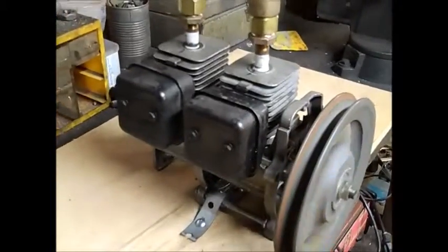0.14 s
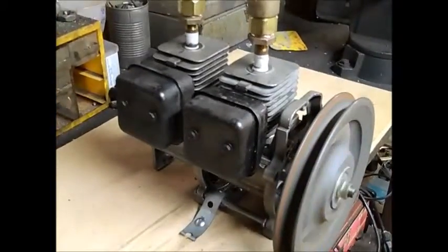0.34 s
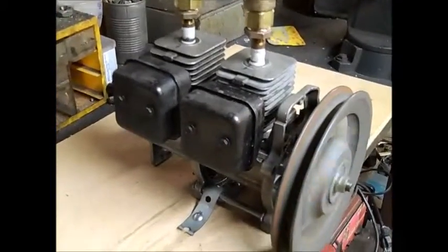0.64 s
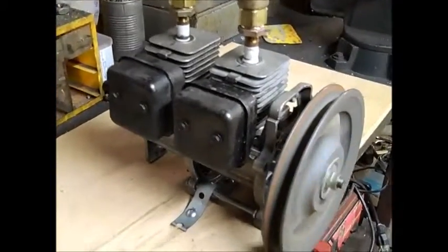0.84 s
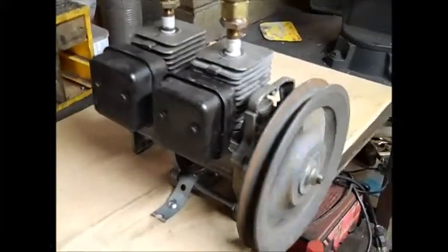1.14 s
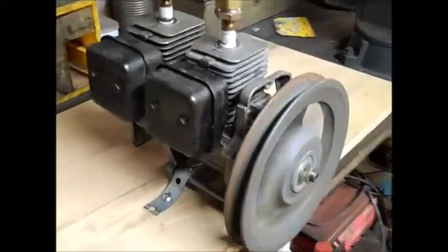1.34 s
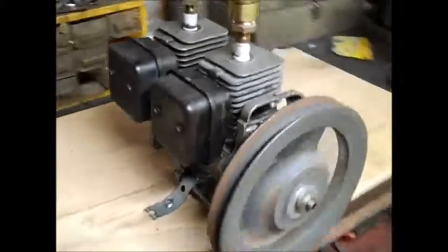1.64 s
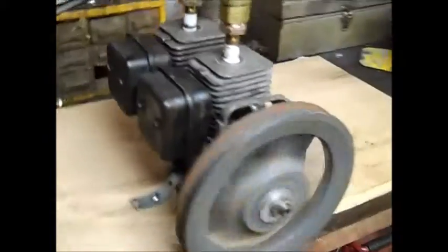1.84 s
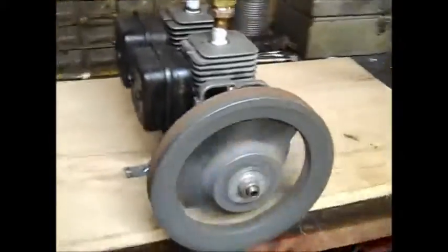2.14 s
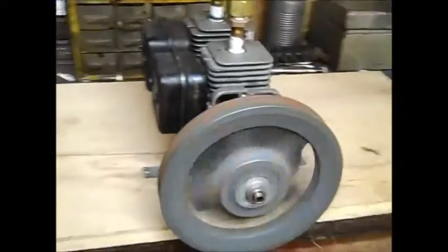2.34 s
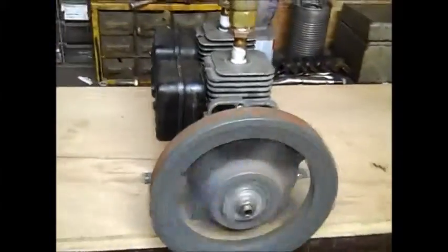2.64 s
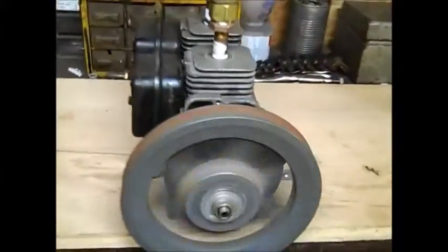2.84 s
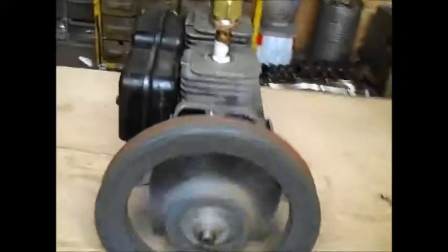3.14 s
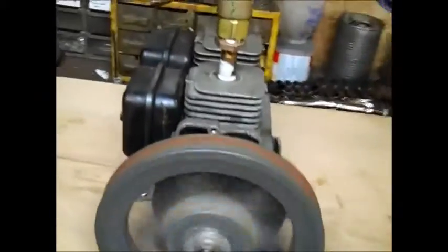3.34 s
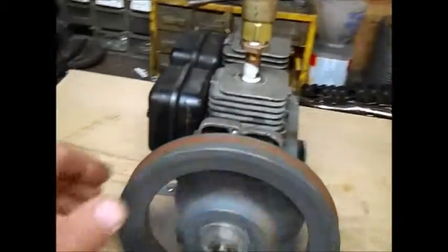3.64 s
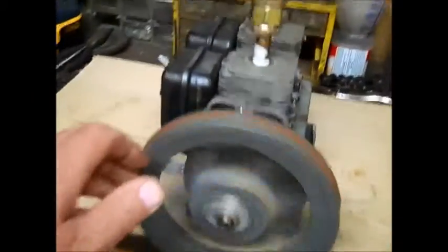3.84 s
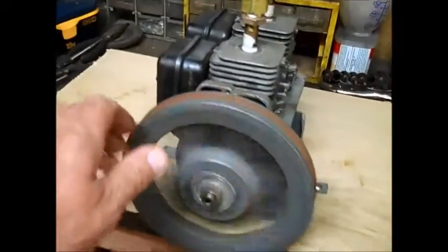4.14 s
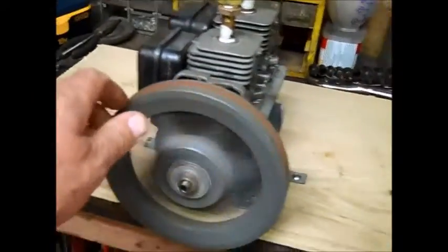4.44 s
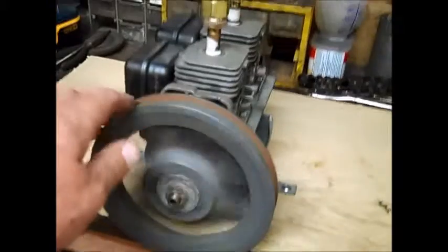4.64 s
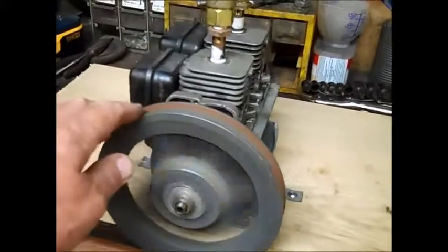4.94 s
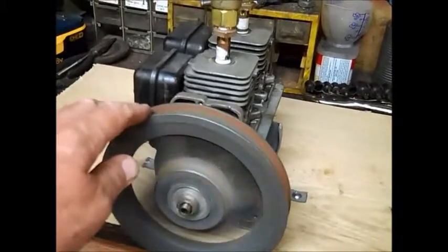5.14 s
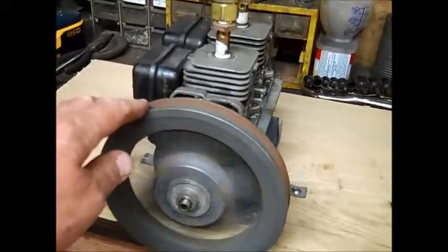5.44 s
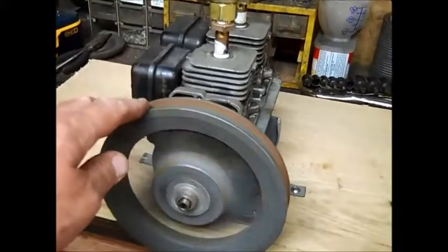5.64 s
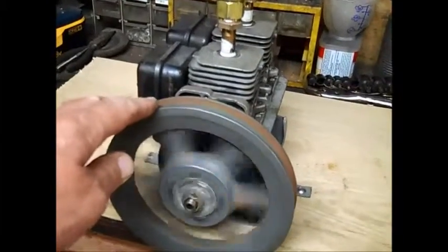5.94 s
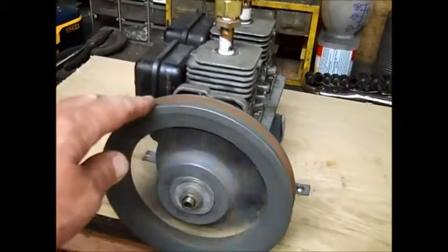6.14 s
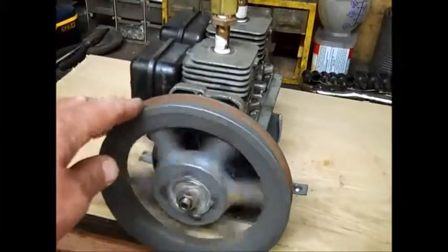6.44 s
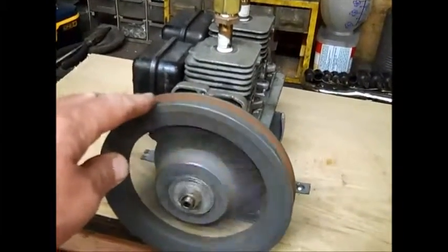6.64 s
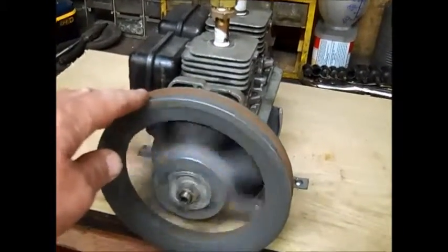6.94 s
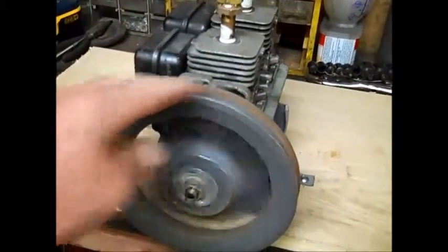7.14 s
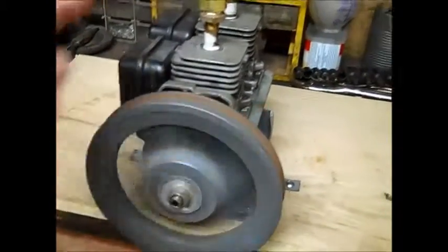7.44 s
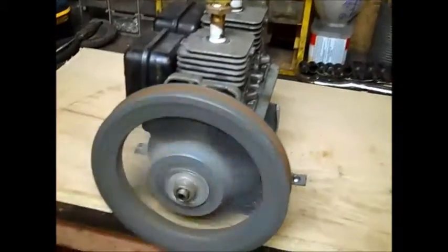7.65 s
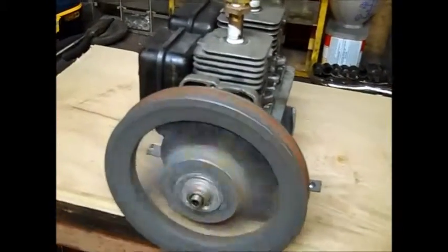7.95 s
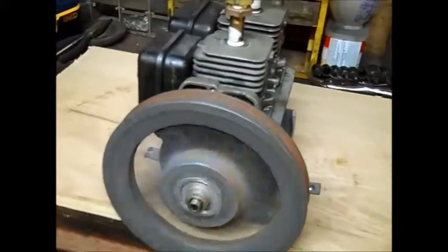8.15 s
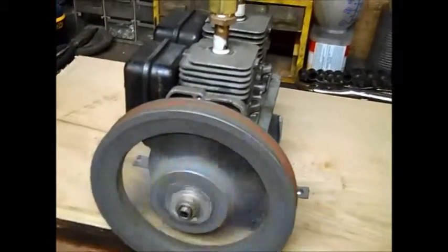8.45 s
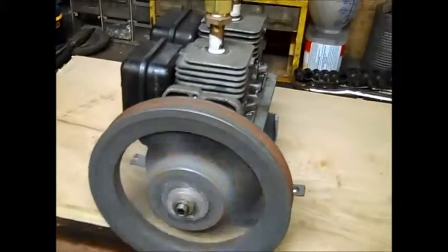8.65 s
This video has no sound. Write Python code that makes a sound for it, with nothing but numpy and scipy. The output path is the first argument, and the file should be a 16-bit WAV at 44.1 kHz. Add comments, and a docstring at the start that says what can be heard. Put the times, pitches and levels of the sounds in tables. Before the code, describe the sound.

A small air-powered engine clacks quickly with puffs and hiss, knocks heavily as a hand slows its flywheel, then speeds up again.

```python
"""Quick, even metal clacks, close up: a small two-cylinder engine runs on compressed air on a workshop bench.
Valves snap shut and rods knock, ringing the cast body; air puffs from the mufflers over a leaking hiss,
and pressure pulses thump the bench. From 5.2 s a hand brakes the flywheel and the knocks grow heavy;
after 7.2 s the wheel is pushed on and gathers speed. The colour of the metal shifts as the listener
walks from the side of the engine round towards the wheel."""
import sys
import numpy as np
from scipy import signal
from scipy.fft import rfft, irfft, next_fast_len
from scipy.io import wavfile
from scipy.ndimage import uniform_filter1d

SR = 44100
rng = np.random.default_rng(int(sys.argv[2]) if len(sys.argv) > 2 else 0)


def generate_wav(sig):
    """Save sig (samples, or channels by samples) to the path in sys.argv[1] as 16-bit PCM at SR."""
    pcm = np.round(np.clip(np.atleast_2d(sig).T, -1, 1) * 32767).astype(np.int16)
    wavfile.write(sys.argv[1], SR, pcm)


N = 387198
SIZE = next_fast_len(N + SR // 2)
HZ = np.maximum(np.arange(SIZE // 2 + 1) * SR / SIZE, 1)

FREE_TURN_S, PUSHED_ON_S = .172, 7.4
FAR_LAG, FAR_LAG_PER_S = .137, .51   # far valve's share of a free turn; more per s of longer turn
SEAT_SPREAD_DB, LOAD_SPREAD_DB = 0.83, 1.5
TWIN_SPLIT = .011   # cast metal: each mode is a pair, this share above and below its pitch
SHOP_T60_S, SHOP_DB, CUTOFF_HZ = 0.25, -14.5, 15500

# Levels are relative, within each layer.
# The crank: steady, braked, pushed on, gathering speed (time [s], turns done [count])
CRANK_TURNS = [(0.0444, 0), (0.5578, 3), (2.2746, 13), (2.9602, 17), (4.1648, 24), (4.5109, 26),
               (4.6883, 27), (4.8755, 28), (5.0751, 29), (5.2815, 30), (5.4998, 31), (5.9615, 33),
               (6.1985, 34), (6.4438, 35), (6.713, 36), (6.9877, 37), (7.3325, 38), (7.5935, 39),
               (7.81, 40), (8.0113, 41), (8.2036, 42), (8.3907, 43), (8.7555, 45)]
# Each stage owns the turns begun in its span (from [s], to [s])
STAGE_SPANS = {"free": (0, 5.2), "braked": (5.2, 7.2), "pushed": (7.2, 7.5), "spinning": (7.5, 9),
               "kick": (7.7, 7.9)}
# The listener's walk (time [s], position [0 side of the engine .. 1 at the wheel])
WALK = [(1.3, 0.018), (2.8, 0.39), (5.0, 0.3), (5.5, 0.56), (8.78, 0.37)]
# Stereo width of noise (frequency [Hz], left-right likeness [0..1])
STEREO_LIKENESS = [(550, 1), (1640, 0.96), (4950, 0.45), (14900, 0.034)]
# Stereo tilt of the mix (frequency [Hz], left over right [dB])
STEREO_TILT = [(2000, 0), (5000, -1), (7000, -1.5), (8500, 10), (14000, 8.5)]
# Noise bed (time [s], leak level [dB], low rush level [dB])
BED_LEVELS = [(0, -33.5, -41), (4.9, -34.5, -42.5), (5.4, -28.5, -35.5), (6.95, -32.5, -35.5),
              (7.05, -37.5, -39), (7.16, -36, -42), (7.25, -31.5, -35), (8.78, -30, -36.5)]
# Hiss of leaking air (frequency [Hz], level [dB])
LEAK_EQ = [(300, -22.5), (500, -5.5), (1030, 3), (3530, -1), (5000, 1), (8190, -3), (14200, -37)]
# Low rush of air (frequency [Hz], level [dB])
RUSH_EQ = [(30, -23), (70, -9.5), (160, -1.5), (400, -2.5), (1200, -31)]
# Pressure pulses of a free turn (place [share of turn], bench level [dB], muffler level [dB])
TURN_PULSES = [(.03, -38, -35.5), (.265, -38, -31), (.4, -42, -73), (.51, -34.5, -46), (.6, -37, -29.5),
               (.68, -35, -33), (.76, -58, -39.5), (.92, -42, -59)]
# Boom of the bench (frequency [Hz], t60 [s], level [dB])
BENCH_MODES = [(63, 0.068, -16), (125, 0.24, -12.5), (149.3, 0.027, 1.5)]
# Muffler cavities (frequency [Hz], t60 [s], level [dB])
MUFFLER_MODES = [(254, 0.026, -8), (299, 0.03, -5), (517, 0.029, -2)]
# Hollow crankcase (frequency [Hz], t60 [s], level [dB])
CRANKCASE_MODES = [(719, 0.062, -2.5)]
# Exhaust hiss (frequency [Hz], level [dB])
PUFF_EQ = [(300, -12), (1400, -2.5), (3500, -4.5), (6600, -1), (10000, -9), (14300, -15.5)]
# Whistling muffler holes (frequency [Hz], width [Hz], level [dB])
HOLE_WHISTLES = [(6460, 190, 1.5), (7600, 580, 1), (10080, 210, 3.5)]
# Knocks and puffs of a free turn (place [share of turn], knock level [dB], puff level [dB])
TURN_RHYTHM = [(0.309, -35, -32), (0.552, -17.5, -74), (.86, -52, -28)]
# Puffs under load, by stage; slopes count per second that a turn outlasts a free one
# (place [share of turn], place slope [share/s], level [dB], level slope [dB/s], length [s])
LOADED_PUFFS = {"braked": [(.3, 1.3, -19.5, 35, 0.03), (.87, -.2, -21, 36, 0.043)],
                "pushed": [(.457, 0.0094, -14.5, 0, 0.042), (.818, 0.028, -12.5, -3, 0.056)],
                "spinning": [(.79, 0.01, -25.5, 126, 0.06)]}
# Rod knocks under load, by stage; "kick" makes one turn's first knock much harder as the wheel speeds up
# (place [share of turn], place slope [share/s], level [dB], level slope [dB/s], thump level [dB])
LOADED_KNOCKS = {"braked": [(.552, .38, -3.5, 4.5, -25.5)], "pushed": [(.555, 0.008, -5.5, 0, -22.5)],
                 "kick": [(.11, 0, -5.5, 0, -23)], "spinning": [(.125, .3, -13, 184, -26),
                 (.46, .6, -15.5, 78, -30.5)]}
# Ring of the engine body (frequency [Hz], t60 before damping [s], near valve level [dB],
# far valve level [dB], knock level [dB], change at the wheel [dB])
BODY_MODES = [(759.5, 0.1, -18, -24.5, -5.5, 13.5), (1000, 0.048, -5.5, -9, 8.5, -6),
              (1383, 0.015, -10, -12, -6, 24), (1724, 0.015, -49, -2, 8.5, 14),
              (2539, 0.023, -18, -47, 13, -44), (3032, 0.049, -3.5, -12, 3, -12),
              (3970, 0.2, -17, -43, -12, 15), (4198, 0.077, -8, -13.5, -12.5, 12.5),
              (4790, 0.007, 5.5, 8.5, 9, -24), (5123, 0.053, -8.5, 3, 1, 7.5), (5424, 0.1, -47, -3, -24, 0),
              (5716, 0.0071, -18, 19.5, -27, -2.5), (6903, 0.045, -1.5, -0.5, -31, 1),
              (8003, 0.034, -4, -5.5, -27, -0.5), (8570, 0.0074, -7.5, -46, -48, 17)]
# Parts in contact shorten that ring (near valve [factor], far valve [factor], knock [factor])
CONTACT_DAMPING = [1.01, 1.026, 2.1]
# Dry crack of metal on metal (frequency [Hz], level [dB])
CRACK_EQ = [(400, -20), (1000, 5.5), (3000, 0.5), (6000, 6), (9000, -2.5), (13800, -15.5), (14600, -71)]
# The near valve's brass under load (frequency [Hz], t60 [s], level [dB])
BRASS_MODES = [(3800, 0.21, -35.5), (4260, 0.021, -24)]
# How hard the near valve seats (time [s], level [dB])
NEAR_SEATING = [(0, 2), (1.5, 2.3), (3, 0.6), (4.7, 0.3), (5.1, 1), (5.5, 6), (6.3, 1), (7, 2)]
# How hard the far valve seats (time [s], level [dB])
FAR_SEATING = [(0, 5), (3, 3.5), (5.1, 2.5), (7.33, 4), (7.6, 8.5), (7.81, -4.5), (8, 9.5), (8.78, 7)]
# Single far valve clacks: two still catch under the brake, one comes late while speeding up
# (time [s], level [dB])
SINGLE_FAR_CLACKS = [(5.3162, -6.5), (5.7705, 0), (7.84, 1)]


def from_db(db):
    """Gain of a level."""
    return 10 ** (np.asarray(db) / 20)


def in_time(rows):
    """Automation curves, one per column, sample by sample."""
    times, *columns = np.transpose(rows)
    return [np.interp(np.arange(N) / SR, times, column) for column in columns]


def at_hz(points):
    """A curve laid on the frequency grid."""
    hz, value = np.transpose(points)
    return np.interp(np.log(HZ), np.log(hz), value)


def unit(response):
    """A filter scaled so that white noise keeps its level."""
    return response / np.sqrt(np.mean(np.abs(response) ** 2))


def pan(left_db):
    """Left and right gains, left_db apart."""
    return from_db(np.array([left_db / 2, -left_db / 2]))


def colour(eq):
    """A broad EQ with minimum phase: nothing sounds before its cause."""
    cepstrum = irfft(np.log(from_db(at_hz(eq))), SIZE)
    cepstrum[1:SIZE // 2] *= 2
    cepstrum[SIZE // 2 + 1:] = 0
    return unit(np.exp(rfft(cepstrum)))


def width(t60):
    """Bandwidth in Hz of a ring that dies in t60 seconds."""
    return np.log(1000) / np.pi / t60


def resonance(hz, width_hz):
    """One resonant band, gain 1 at its peak."""
    return 1 / (1 + 1j * (HZ / hz - hz / HZ) * hz / width_hz)


def rings(modes):
    """Modes in parallel, each started by a soft, broad push."""
    return sum(from_db(db) * SR * resonance(hz, width(t60)) * resonance(hz, hz) / (np.pi * width(t60))
               for hz, t60, db in modes)


def clicks(times, dbs):
    """Spectrum of a click train."""
    train = np.zeros(N)
    np.add.at(train, np.round(np.asarray(times) * SR).astype(int) % N, from_db(dbs))
    return rfft(train, SIZE)


def bursts(times, dbs, rise_s, fall_s):
    """An envelope that swells to each level and dies away."""
    envelope, t = np.zeros(N), np.arange(SR // 5) / SR
    for time, db, rise, fall in zip(*np.broadcast_arrays(times, dbs, rise_s, fall_s)):
        shape = (1 - np.exp(-t / rise)) * np.exp(-t / max(fall, .002))
        start = round(time * SR)
        envelope[start:start + len(t)] += (from_db(db) * shape / shape.max())[:N - start]
    return envelope


def grainy_noise(envelope, grain_db):
    """Stereo spectra of gritty noise under an envelope: centred bass, wide treble."""
    grain = from_db(grain_db * np.repeat(rng.standard_normal(N // 24 + 1), 24)[:N])
    mid, side = rfft(envelope * unit(grain) * rng.standard_normal((2, N)), SIZE)
    alike = np.clip(at_hz(STEREO_LIKENESS), 0, 1)
    return (np.sqrt(1 + alike) * mid + np.sqrt(1 - alike) * side * [[1], [-1]]) / np.sqrt(2)


def turns(*stages):
    """Start and length in seconds of every crank turn begun in these stages."""
    times, done = np.transpose(CRANK_TURNS)
    edges = np.interp(np.arange(done[-1] + 1), done, times)
    edges = np.r_[edges[0] - FREE_TURN_S, edges, edges[-1] + FREE_TURN_S]
    starts, inside = edges[:-1], False
    for stage in stages:
        begin, end = STAGE_SPANS[stage]
        if stage == "free":
            begin -= 1   # take in the turn already under way
        inside = inside | ((starts > begin) & (starts < end))
    return starts[inside], np.diff(edges)[inside]


def free_turns(pattern, spread_db):
    """A pattern looped over the free turns, its levels varied: times and two rows of levels."""
    starts, lengths = turns("free")
    share, *dbs = np.transpose(pattern)
    times = (starts[:, None] + share * lengths[:, None]).ravel()
    dbs = np.tile(dbs, len(starts)) + spread_db * rng.standard_normal((len(times), 2)).T
    return times[times > 0], *dbs[:, times > 0]


def loaded_turns(patterns):
    """Each stage's hits, mostly later and harder in a slow turn: times, levels, last column."""
    hits = []
    for stage, pattern in patterns.items():
        for start, length in zip(*turns(stage)):
            extra_s = length - FREE_TURN_S
            hits += [(start + length * (share + later * extra_s), db + harder * extra_s, last)
                     for share, later, db, harder, last in pattern]
    times, dbs, last = np.transpose([hit for hit in hits if hit[0] < N / SR])
    return times, dbs + LOAD_SPREAD_DB * rng.standard_normal(len(times)), last


def workshop():
    """The room: direct sound plus a short wash of echoes, different left and right."""
    t = np.arange(SR // 2) / SR
    wash = rng.standard_normal((2, len(t))) * from_db(-60 * t / SHOP_T60_S) * (t > .006)
    return 1 + from_db(SHOP_DB) * unit(rfft(wash, SIZE))


def hiss_bed(body_ring):
    """Leaking air and bearings hiss on, partly through the body, with a low rush beneath."""
    leak_db, rush_db = in_time(BED_LEVELS)
    flicker_db = uniform_filter1d(rng.standard_normal(N), size=900) * 60   # about 2 dB
    leak = grainy_noise(from_db(leak_db + flicker_db), grain_db=3.0)
    rush = grainy_noise(from_db(rush_db), grain_db=-1.8)
    return leak * (colour(LEAK_EQ) + from_db(-10) * body_ring) + rush * colour(RUSH_EQ)


def pressure_pulses(knocks, puffs):
    """The low end: pulses thump bench and mufflers; loaded knocks also ring the crankcase."""
    times, bench_db, muffler_db = free_turns(TURN_PULSES, spread_db=1.1)
    knock_at, _, thump_db = knocks
    puff_at, puff_db, _ = puffs
    faster = knock_at > PUSHED_ON_S   # gathering speed: more hollow tone, less bench
    bench = clicks(times, bench_db) + clicks(puff_at, puff_db - 14)
    bench += clicks(knock_at, thump_db + np.where(faster, -3, 4))
    mufflers = clicks(times, muffler_db) + clicks(puff_at, puff_db - 11)
    mufflers += clicks(knock_at + 0.00637, thump_db + 4.5)
    crankcase = clicks(knock_at + 0.00342, thump_db + np.where(faster, 6, -6))
    return (bench * rings(BENCH_MODES) + mufflers * rings(MUFFLER_MODES)
            + crankcase * rings(CRANKCASE_MODES))


def exhaust(knocks, puffs):
    """Puffs hiss through the mufflers and whistle faintly; heavy knocks let out a low rush."""
    free_at, _, free_db = free_turns(TURN_RHYTHM, spread_db=2.5)
    puff_at, puff_db, length_s = puffs
    knock_at, _, thump_db = knocks
    breath = bursts(free_at, free_db, 0.002, 0.021) + bursts(puff_at, puff_db, 0.011, length_s / 2)
    whistles = sum(from_db(db) * 2 * resonance(hz, width_hz) for hz, width_hz, db in HOLE_WHISTLES)
    rush = grainy_noise(bursts(knock_at, thump_db, 0.0054, 0.038), grain_db=-2.5) * colour(RUSH_EQ)
    hiss = grainy_noise(breath, grain_db=3.5) * colour(PUFF_EQ)
    return hiss * from_db(-5) * (1 + whistles) + rush


def cast_body():
    """The body's twin modes for near valve, far valve and knock: each (from the side, from the wheel)."""
    *contact_dbs, wheel_db = np.array(BODY_MODES)[:, 2:].T
    responses = []
    for level_db, damping in zip(contact_dbs, CONTACT_DAMPING):
        modes = []
        for k, (hz, t60, *_) in enumerate(BODY_MODES):
            ring_s = t60 / damping
            lower = resonance(hz * (1 - TWIN_SPLIT), width(ring_s))
            upper = resonance(hz * (1 + TWIN_SPLIT), width(ring_s))
            modes.append((-1) ** k * np.sqrt(ring_s / 2) * (lower - upper))
        responses.append(from_db([level_db, level_db + wheel_db]) @ np.array(modes))
    return responses


def strike(times, dbs, envelope, body, blow_db, ring_db, crack_db, grain_db, pan_db):
    """A clean blow rings the body, its rattle rings and cracks; the tone crossfades with the walk."""
    walk_at, position = np.transpose(WALK)
    crack = from_db(crack_db) * colour(CRACK_EQ)
    hits = 0
    for share, response in zip((1 - position, position), body):
        ring = from_db(ring_db) * response
        fade = np.sqrt(np.interp(np.arange(N) / SR, walk_at, share))
        rattle = grainy_noise(envelope * fade, grain_db)
        share_db = 20 * np.log10(np.interp(times, walk_at, share) + 1e-6)
        blow = clicks(times, dbs + blow_db + share_db)
        hits = hits + rattle * (ring + crack) + blow * ring
    return hits * pan(pan_db)[:, None]


def rod_knocks(knocks, body):
    """The rods rattle lightly when running free and land real blows under load."""
    free_at, free_db, _ = free_turns(TURN_RHYTHM, spread_db=2.5)
    times, dbs, _ = knocks
    rise_s = 0.00029 * from_db(-1.6 * dbs)   # weak knocks have a softer attack
    rattle = bursts(free_at, free_db, 0.0029, 0.0083) + bursts(times, dbs, rise_s, 0.014)
    return strike(times, dbs, rattle, body, blow_db=12, ring_db=21, crack_db=-8, grain_db=4, pan_db=.1)


def valve_seatings():
    """Times and levels for each valve: the near one seats at the start of each turn until the push; the far one
    seats a little later in each free turn, then at the start of each turn after the push, plus its single
    clacks."""
    near_at = turns("free", "braked")[0][1:]
    starts, lengths = turns("free")
    lag_s = lengths * (FAR_LAG + FAR_LAG_PER_S * (lengths - FREE_TURN_S))
    far_at = np.r_[(starts + lag_s)[1:], turns("pushed", "spinning")[0]]
    seatings = []
    for times, force in ((near_at, NEAR_SEATING), (far_at, FAR_SEATING)):
        dbs = np.interp(times, *np.transpose(force)) + SEAT_SPREAD_DB * rng.standard_normal(len(times))
        seatings.append(np.array([times, dbs]))
    near, far = seatings
    return near, np.c_[far, np.transpose(SINGLE_FAR_CLACKS)]


def brass_clanks(near):
    """Under the brake the near valve's brass rings on, each time a little differently."""
    times, dbs = near[:, near[0] > STAGE_SPANS["braked"][0]]
    spread_db = 2 * rng.standard_normal((len(times), len(BRASS_MODES)))
    return sum(clicks(times, dbs + spread_db[:, k]) * rings([mode]) for k, mode in enumerate(BRASS_MODES))


def valve_clacks(seatings, body, rise_s, fall_s, crack_db, pan_db):
    """A valve snaps shut and chatters on its seat for a few milliseconds."""
    chatter = bursts(*seatings, rise_s, fall_s)
    return strike(*seatings, chatter, body,
                  blow_db=14, ring_db=19, crack_db=crack_db, grain_db=3, pan_db=pan_db)


def scene():
    """Metal, air and low end play into the workshop, over the bed of hiss."""
    near_body, far_body, knock_body = cast_body()
    near, far = valve_seatings()
    knocks, puffs = loaded_turns(LOADED_KNOCKS), loaded_turns(LOADED_PUFFS)
    metal = (valve_clacks(near, near_body, rise_s=0.00033, fall_s=0.0065, crack_db=-12, pan_db=.5)
             + valve_clacks(far, far_body, rise_s=0.00034, fall_s=0.0047, crack_db=-14, pan_db=-1.5)
             + rod_knocks(knocks, knock_body) + brass_clanks(near))
    engine = metal + exhaust(knocks, puffs) + pressure_pulses(knocks, puffs)
    mix = engine * workshop() + hiss_bed(knock_body[1])
    return irfft(mix * pan(at_hz(STEREO_TILT)), SIZE)[:, :N]


def record(dry):
    """The loudest clacks clip; a steep low-pass takes off the very top."""
    low_pass = signal.cheby2(10, 50, CUTOFF_HZ, fs=SR, output="sos")
    return signal.sosfilt(low_pass, np.clip(dry, -1, 1))


dry = scene()
out = record(dry)
generate_wav(out)
```